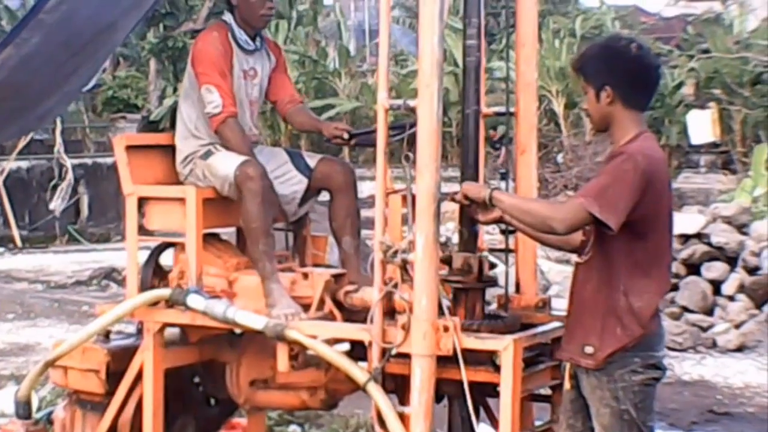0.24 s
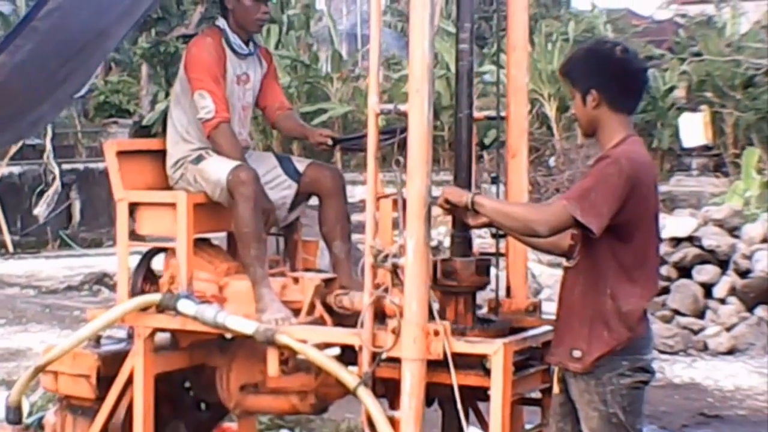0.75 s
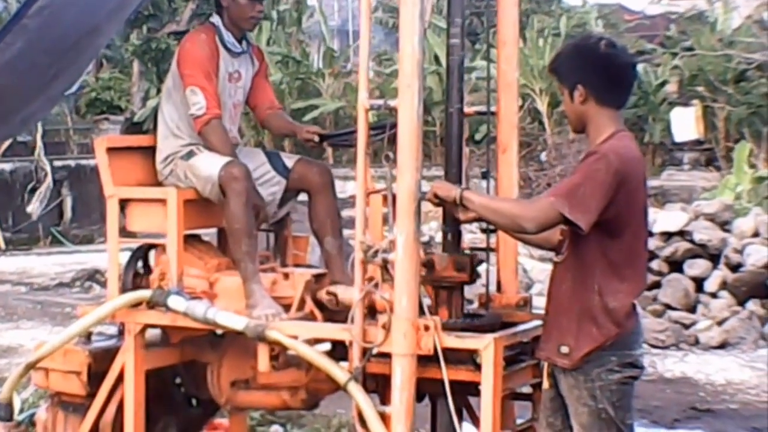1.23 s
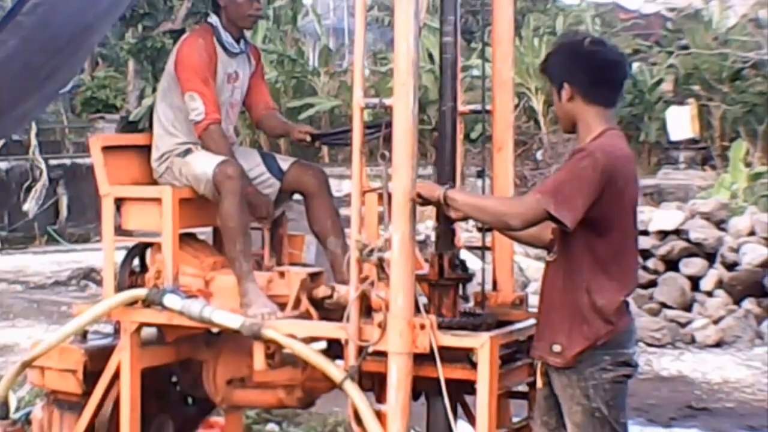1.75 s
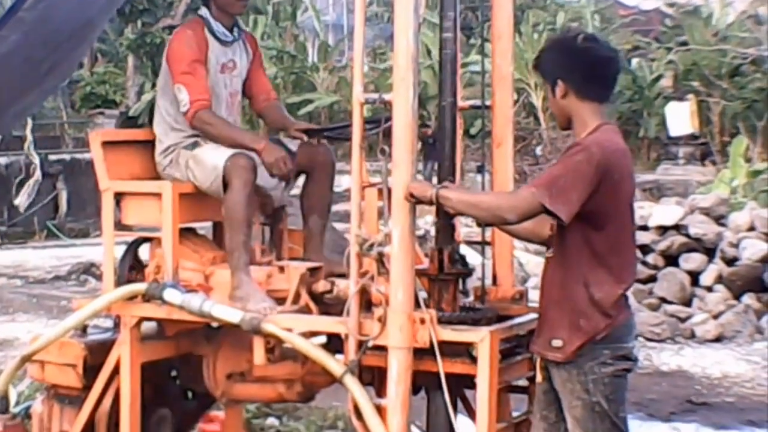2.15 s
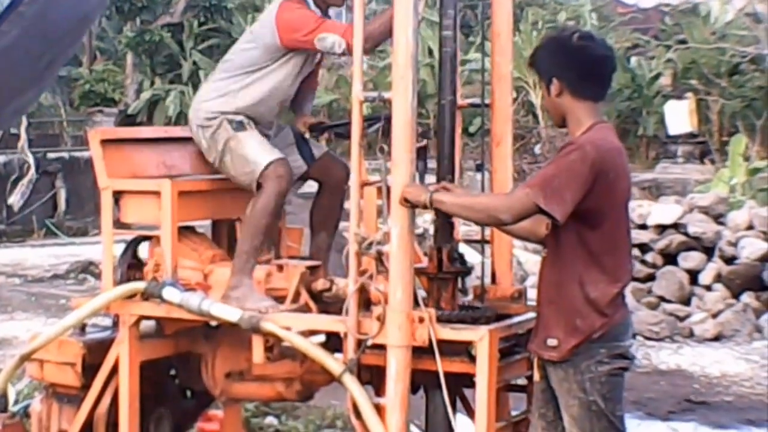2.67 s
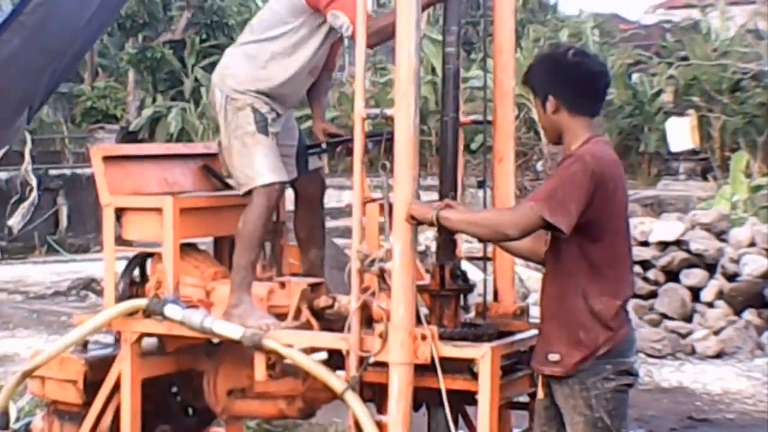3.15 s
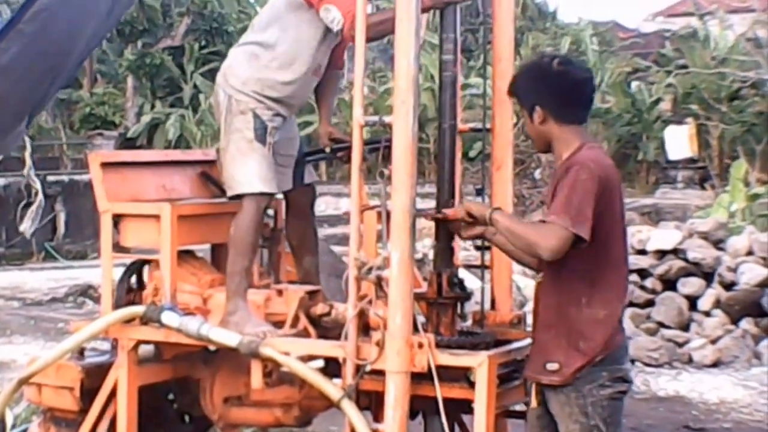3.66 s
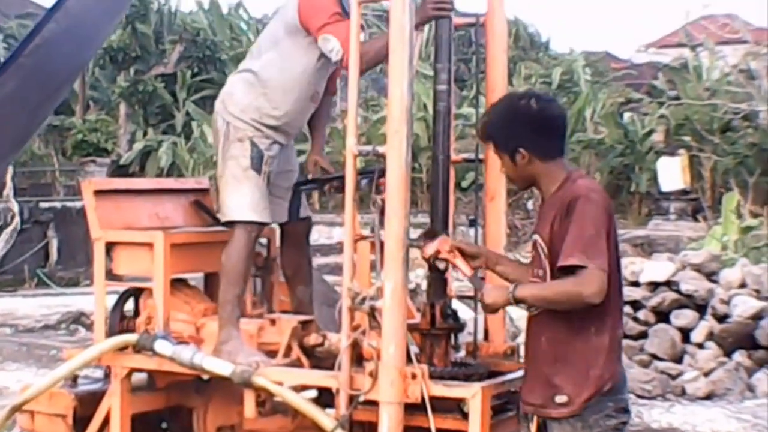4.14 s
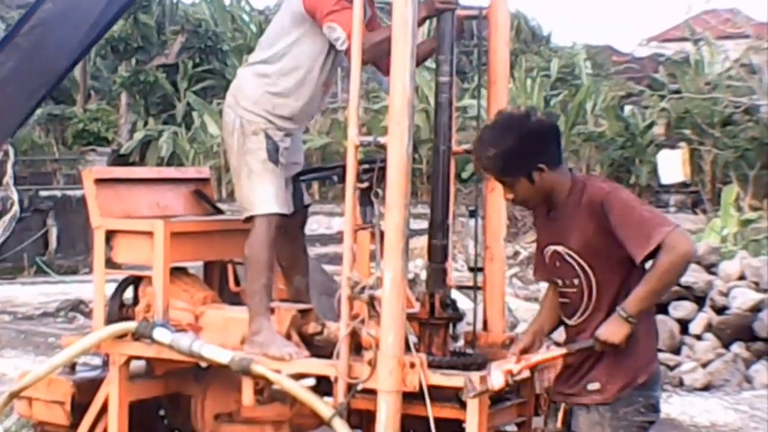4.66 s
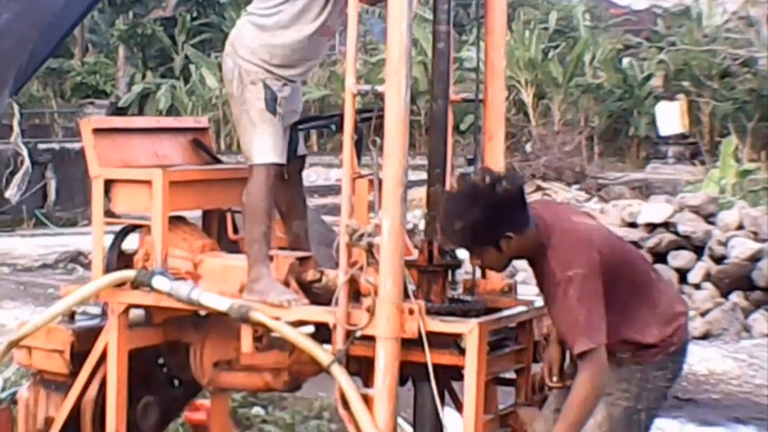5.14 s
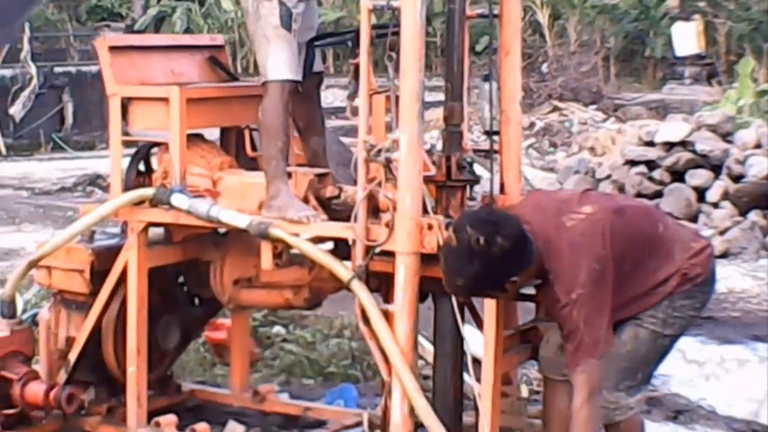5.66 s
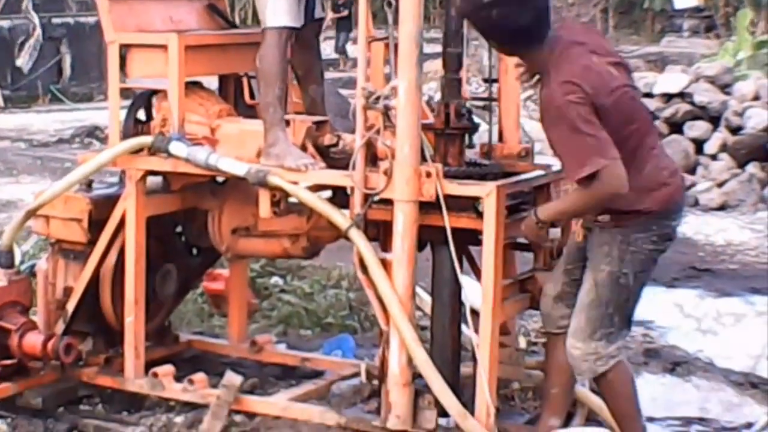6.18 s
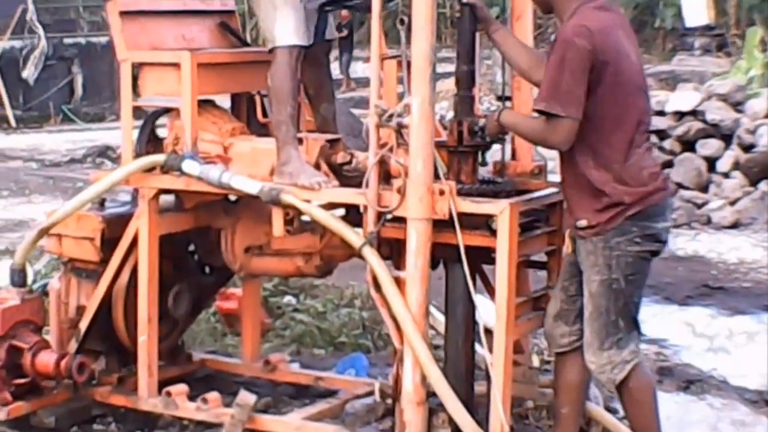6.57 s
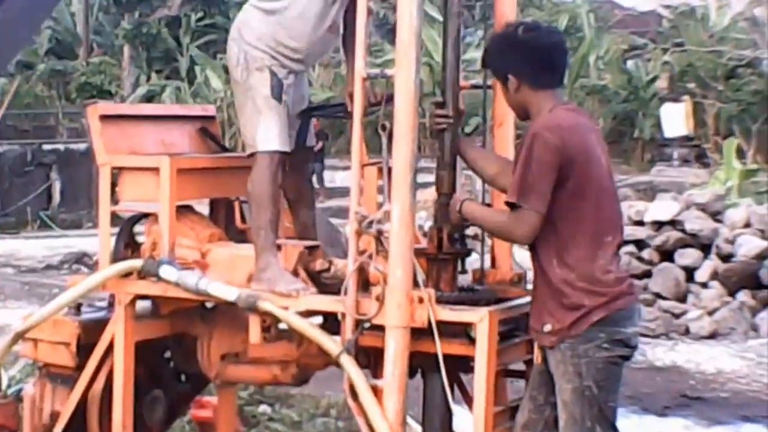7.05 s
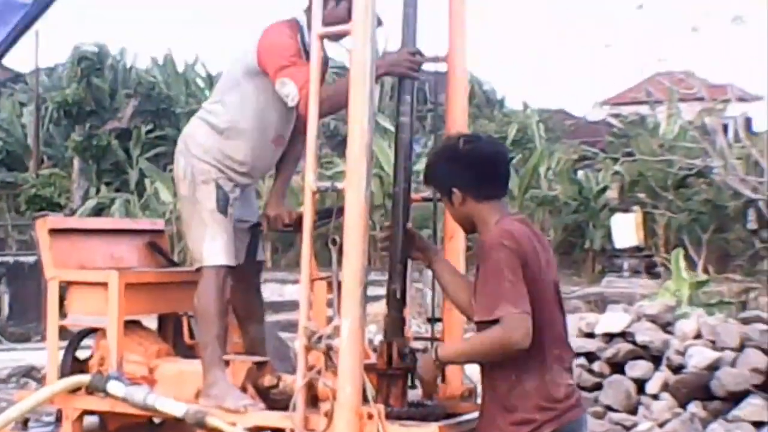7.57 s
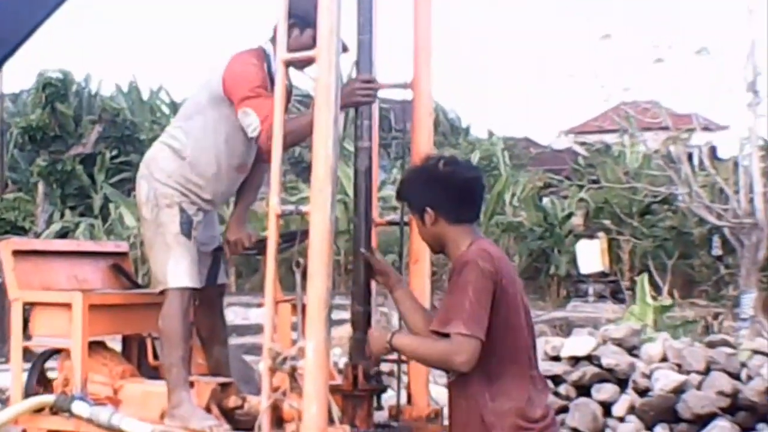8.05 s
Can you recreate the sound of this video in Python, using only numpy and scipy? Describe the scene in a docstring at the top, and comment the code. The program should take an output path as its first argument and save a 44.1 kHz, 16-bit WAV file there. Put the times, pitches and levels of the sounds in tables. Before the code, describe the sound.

A small diesel engine chugs without pause in the open air, its fast even pulse mixing dull exhaust thumps, hollow block knocks, and thin rattling covers and gears. Occasional strokes clatter slightly harder. One abrupt steel-on-steel clank stands out after five seconds, then a soft brighter clink. Near the end comes a barely noticeable squeak while the nearby mono pickup turns away and the engine drops in level.

```python
"""A single-cylinder four-stroke diesel idles on a small drilling rig outdoors, firing nine times a second.
Each cycle rings three gas thumps in pipe and chamber resonances; knocks and a noisy wash of clatter shake
block, covers and gears, each a coloured filter with modes. A steel hand tool drops beside the rig as a
cluster of damped and free modes and clinks again; late on, one tiny squeak, and the microphone turns away."""
import sys
import numpy as np
from scipy import signal
from scipy.fft import rfft, irfft, next_fast_len
from scipy.io import wavfile

SR = 44100
rng = np.random.default_rng(int(sys.argv[2]) if len(sys.argv) > 2 else 0)


def store_pcm(level_fs):
    """Save levels as 16-bit WAV."""
    pcm = np.round(np.clip(level_fs, -1, 1) * 32767).astype(np.int16)
    wavfile.write(sys.argv[1], SR, np.atleast_2d(pcm).T)


N = 366471
TIME = np.arange(N) / SR
MS = 1e-3

# Gas thumps as the valves open and shut. Each row: delay after firing in ms, push (1) or pull (-1),
# relative level in dB, pipe resonance and its width in Hz, chamber resonance and its width in Hz.
GAS_THUMPS = [(25.61, -1, 0.5, 143.98, 29.7, 100.1, 50.6), (58.7, -1, 7, 270.56, 48.6, 170.8, 37.9),
              (89.89, 1, -4, 143.6, 125.8, 188.3, 42.5)]


def from_db(db):
    """Decibels to an amplitude factor."""
    return 10 ** (np.asarray(db) / 20)


def rms_one(x):
    """Scale a signal to an rms of one."""
    return x / np.sqrt(np.mean(x ** 2) + 1e-20)


def read(rows, at):
    """Every further column of a table, interpolated along the first."""
    first, *columns = np.transpose(rows)
    return [np.interp(at, first, column) for column in columns]


def drift(rate):
    """Slow chance with an rms of one, drawn at the given rate per second and joined by straight lines."""
    knots = rng.standard_normal(int(N / SR * rate) + 2)
    return rms_one(np.interp(TIME * rate, np.arange(len(knots)), knots))


def clicks(times, sizes):
    """One impulse of the given size at each time in seconds."""
    at = np.round(times * SR).astype(int)
    inside = (at >= 0) & (at < N)
    # the inaudible offset keeps the signal from being exactly zero
    return np.bincount(at[inside], sizes[inside], N) + 1e-18


def burst(blows, decay_s):
    """Noise that each blow sets going and that dies away exponentially."""
    envelope = signal.lfilter([1], [1, -np.exp(-1 / (decay_s * SR))], blows)
    return envelope * rng.standard_normal(N)


def resonate(x, hz, width):
    """A two-pole resonance, width in Hz, with a gain of about one at its top."""
    r = np.exp(-np.pi * width / SR)
    zeros = np.array([1, 0, -1]) * (1 - r * r) / 2
    poles = [1, -2 * r * np.cos(2 * np.pi * hz / SR), r * r]
    return signal.lfilter(zeros, poles, x)


def ring(x, hz, t60):
    """A unit click starts a sine of height one that falls by 60 dB in t60 seconds."""
    r, w = np.exp(-np.log(1000) / (t60 * SR)), 2 * np.pi * hz / SR
    return signal.lfilter([0, np.sin(w)], [1, -2 * r * np.cos(w), r * r], x)


def iron(force, colour, modes):
    """A body answers a force: a causal filter of the given colour, with its modes on top; rms one."""
    size = 2 * next_fast_len(N // 2 + SR // 4)
    hz, db = np.transpose(colour)
    grid = np.maximum(np.arange(size // 2 + 1) * SR / size, 1)
    gain = from_db(np.interp(np.log(grid), np.log(hz), db))
    # folding the cepstrum forward gives minimum phase: nothing sounds before the blow
    cepstrum = irfft(np.log(gain))
    folded = np.r_[cepstrum[0], 2 * cepstrum[1:size // 2]]
    response = np.exp(rfft(folded, size))
    out = irfft(rfft(force, size) * response)[:N]
    for mode_hz, width, lift_db in modes:
        out = out + (from_db(lift_db) - 1) * resonate(out, mode_hz, width)
    return rms_one(out)


def squeak(s=7.68, hz=6380, db=-44, length_s=0.0042):
    """One tiny high squeak from the machinery: a sine under a bell-shaped envelope."""
    return from_db(db) * np.exp(-((TIME - s) / length_s) ** 2) * np.sin(2 * np.pi * hz * TIME)


def tool(flat_t60=0.0182, free_t60=0.16, crack_db=-15, crack_s=0.00079, scatter_db=-24, scatter_s=0.013):
    """Landing flat, the steel is damped at once and cracks; touched lightly, it rings on."""
    # The tool lands, bounces and is nudged beside the rig. Each row: start in seconds, level in dB,
    # share of dull clank (0-1), level of the free ring in dB.
    tool_hits = [(5.4240, -11, 0.98, -40.5), (5.4259, -12, 0.81, -42), (5.4300, -13.5, 0.98, -42.5),
                 (5.4319, -10, 0.81, -42.5), (5.4333, -12, 0.83, -41.5), (5.438, -22.5, 1, -31),
                 (5.4486, -21.5, 0.92, -30.5), (5.4505, -22.5, 0.94, -30.5), (5.8890, -30, 0.85, -5),
                 (5.9020, -34.5, 1, -17), (5.9250, -33, 0.94, -4.5)]
    # Modes of the steel. Each row: frequency in Hz, level in dB landing flat, level in dB ringing free.
    tool_modes = [(1635, -7, -29.5), (1792, -6.5, -18.5), (2260, -13.5, -24.5), (3672, -10.5, 3),
                  (3932, -10, -17.5), (4130, -18, -8.5), (4520, -6, -4.5), (4683, -8.5, -18),
                  (5030, -23, -6.5), (5800, -19, -20.5), (6735, -30.5, -24.5), (7542, -41.5, -19),
                  (8488, -26, -23.5), (11500, -41, -24.5), (12360, -31, -25.5)]
    s, db, clank, free_db = np.transpose(tool_hits)
    out = 0
    for hz, flat_db, ring_db in tool_modes:
        # every hit excites each mode a little differently, with either sign
        strength = from_db(db + rng.standard_normal(len(s))) * rng.choice([-1, 1], len(s))
        flat_blows = clicks(s, strength * clank * from_db(flat_db))
        free_blows = clicks(s, strength * from_db(free_db + ring_db))
        out = out + ring(flat_blows, hz, flat_t60) + ring(free_blows, hz, free_t60)
    blows = clicks(s, from_db(db) * clank)
    crack = from_db(crack_db) * resonate(burst(blows, crack_s), 3900, 5400)
    # the frame of the rig scatters the blow into a short, duller tail
    band = signal.butter(2, [1400, 5500], "band", fs=SR, output="sos")
    scatter = signal.sosfilt(band, burst(blows, scatter_s))
    return out + crack + from_db(scatter_db) * scatter


def crank(first_firing_s=-0.04537, cycle_s=0.11119, quickening_s=6.08e-6):
    """Firing times of an idle whose every cycle is a shade shorter, and seconds since the last firing."""
    cycles = cycle_s - quickening_s * np.arange(int(N / SR / cycle_s) + 2)
    fired = first_firing_s + np.r_[0, np.cumsum(cycles)]
    since = TIME - fired[np.searchsorted(fired, TIME, "right") - 1]
    return fired, since


def thumps(fired, uneven_db=0.5):
    """Each puff of gas rings a pipe and then a chamber, nearly alike from cycle to cycle."""
    out = 0
    for ms, push, db, pipe_hz, pipe_width, chamber_hz, chamber_width in GAS_THUMPS:
        sizes = np.sign(push) * from_db(db + uneven_db * rng.standard_normal(len(fired)))
        puffs = clicks(fired + ms * MS, sizes)
        in_pipe = resonate(puffs, pipe_hz, pipe_width)
        out = out + resonate(in_pipe, chamber_hz, chamber_width)
    low_pass = signal.butter(2, 1100, fs=SR, output="sos")
    return rms_one(signal.sosfilt(low_pass, out))


def knocks(fired, uneven_db, jitter_ms):
    """Ignition and the piston crossing its bore strike block and covers at nearly set times after firing."""
    # Each row: delay after firing in ms, relative level in dB into the block, the same into the covers.
    knock_rows = [(1.187, 12.5, 16.5), (3.595, -7.5, 16.5), (7.281, 18.5, 12.5), (14.772, 21.5, 18),
                  (36.5, 13.5, 17), (60.09, 17, 3)]
    block, covers = 0, 0
    for ms, block_db, cover_db in knock_rows:
        late, strong = rng.standard_normal((2, len(fired)))
        blows = clicks(fired + (ms + jitter_ms * late) * MS, from_db(uneven_db * strong))
        block = block + from_db(block_db) * blows
        covers = covers + from_db(cover_db) * blows
    return block, covers


def clatter(since, recurring, grain_db, flutter_db, per_s=5000):
    """Tiny contacts of uneven size; a share of the noise power recurs alike after every firing."""
    sizes = rng.standard_normal(N) * from_db(grain_db * np.minimum(rng.exponential(1, N), 5))
    contacts = rms_one(sizes * (rng.random(N) < per_s / SR))
    share = np.clip(recurring, 0, 1)
    # one noise pattern, read again from its start at each firing
    place = np.clip(since * SR, 0, SR - 1).astype(int)
    same = rms_one(rng.standard_normal(SR)[place])
    mixed = np.sqrt(1 - share) * contacts + np.sqrt(share) * same
    return mixed * from_db(flutter_db * drift(70))


def swell(since, start_db, fade_db_per_s, attack_s=0.01325, hold_s=0.05986):
    """Each firing sets the clatter going; it holds through the power stroke, then dies down."""
    rising = np.maximum(1 - since / attack_s, 0)
    fading = np.maximum(since - hold_s, 0)
    return from_db(start_db * rising - fade_db_per_s * fading)


def valves(since, lag_s=0.00352, length_s=0.00433):
    """A short bell-shaped swell of valve gear rattle just after each gas thump."""
    return sum(np.exp(-((since - ms * MS - lag_s) / length_s) ** 2) for ms, *_ in GAS_THUMPS)


def loads(fired, since, burn_db=0.5, wander_db=0.3373, block_wander_db=0.9, valve_db=4):
    """How hard block, covers and gears are shaken; no two charges burn alike, and the block varies most."""
    burn = rng.standard_normal(len(fired))[np.searchsorted(fired, TIME, "right") - 1]
    block = swell(since, start_db=-7, fade_db_per_s=127) * from_db(block_wander_db * drift(6))
    covers = swell(since, start_db=-1.0, fade_db_per_s=143)
    gears = swell(since, start_db=-2, fade_db_per_s=126) * from_db(valve_db * valves(since))
    return from_db(burn_db * burn + wander_db * drift(25)) * np.array([block, covers, gears])


def hard_strokes(block_db=-7.0, cover_db=-8.5, gear_db=-10, stroke_s=0.0118):
    """Now and then the parts meet harder: an extra load that dies within the cycle, one row for each part."""
    # Each row: start in seconds, then relative peak in dB for gears, block and covers before the trims above.
    stroke_rows = [(0.7311, -33.5, -24, -21), (0.9701, -31.5, -28.5, -20), (1.189, -30.5, -14, -21),
                   (1.6247, -38, -25, -20), (2.1894, -37, -22, -23), (2.8467, -32.5, -21.5, -27),
                   (3.9704, -29, -20, -24), (4.638, -35, -18.5, -23.5), (4.8435, -26, -29.5, -24),
                   (5.0639, -34, -19.5, -25), (5.8417, -29, -20, -28.5), (6.6159, -26.5, -22, -23),
                   (7.063, -28, -21, -17)]
    s, gear, block, covers = np.transpose(stroke_rows)
    bursts = [clicks(s, from_db(db)) for db in (block + block_db, covers + cover_db, gear + gear_db)]
    return signal.lfilter([1], [1, -np.exp(-1 / (stroke_s * SR))], bursts)


def engine(block_knock_db=0.5, cover_knock_db=1.0):
    """Thumps below; knock and clatter in the block and thin covers, clatter alone in the gears."""
    # Broad colour of each part. Each row: frequency in Hz, relative level in dB.
    block_colour, cover_colour, gear_colour = [(20, -23.5), (45, -23), (130, -12.5), (290, -10), (400, -15),
                                               (490, -21.5), (560, -11.5), (680, -10.5), (760, -4.5),
                                               (900, -2), (1000, -3), (1150, -13), (1350, -39),
                                               (3000, -63.5)], [(600, -51), (1000, -17), (1200, -7),
                                                              (1400, -1), (1720, -3.5), (1780, -13.5),
                                                              (1900, -5), (2130, -10), (2380, -9),
                                                              (2600, -25), (3200, -42), (6000, -86.5)], [(1500, -38), (2500, -7),
                                                                              (2950, 4.5), (3250, -3),
                                                                              (3700, 0.5), (4400, -2.5),
                                                                              (5500, -7), (6850, -11),
                                                                              (7200, -20.5), (8400, -20.5),
                                                                              (9200, -17.5), (10800, -21),
                                                                              (11200, -24), (15700, -24)]
    # Resonances standing out of that colour. Each row: frequency in Hz, width in Hz, lift in dB.
    block_modes, cover_modes, gear_modes = [(272.2, 10, 6.5), (462.6, 20.5, 7.5), (763.6, 13, 3.5),
                                            (827.6, 13.7, 2.5), (916.5, 26.6, 6.5)], [(1157.7, 24.3, 5.7), (1270.6, 31.7, 10.46),
                                                                 (1409, 13.4, 4.22), (1481, 16.4, 5.74),
                                                                 (1602.4, 42, 2.1), (1752.7, 20, 5.66),
                                                                 (1876, 23, 0.5), (2204, 57, 2.14)], [(4254, 205, 2.14),
                                                                                      (6290, 66, 1.85),
                                                                                      (8650, 81, 6.5),
                                                                                      (9130, 152, 2.6),
                                                                                      (10640, 80, 5),
                                                                                      (12600, 80, 8.6),
                                                                                      (13130, 260, 4.2),
                                                                                      (14000, 310, 3.1),
                                                                                      (14440, 80, 6.8)]
    # The microphone edges closer, then turns away. Each row: time in seconds, engine level in dB.
    facing = [(0, 0.43), (4.3, -0.2151), (5.4, 0.17), (6.0, 1.2), (7.45, 1.16), (7.9, -2.5), (8.31, -5.5)]
    fired, since = crank()
    # thumps, block, covers and gears at the microphone, in dB before the facing is added
    level = from_db([[-31], [-29.5], [-32.5], [-46]]) * from_db(read(facing, TIME))
    # dividing by the level keeps the hard strokes' strength independent of the facing
    block_load, cover_load, gear_load = np.hypot(loads(fired, since), hard_strokes() / level[1:])
    block_knock, cover_knock = knocks(fired, uneven_db=1.6, jitter_ms=0.065)

    block_clatter = clatter(since, recurring=0.128, grain_db=0.99, flutter_db=-0.0345, per_s=8000)
    block_force = from_db(block_knock_db) * block_knock + block_load * block_clatter
    block = iron(block_force, block_colour, block_modes)

    cover_clatter = clatter(since, recurring=0.0694, grain_db=0.5, flutter_db=0.4441, per_s=9000)
    cover_force = from_db(cover_knock_db) * cover_knock + cover_load * cover_clatter
    covers = iron(cover_force, cover_colour, cover_modes)

    gear_clatter = clatter(since, recurring=0.029, grain_db=1.0, flutter_db=0.98, per_s=12000)
    gears = iron(gear_load * gear_clatter, gear_colour, gear_modes)
    return np.sum(level * [thumps(fired), block, covers, gears], axis=0)


def reflected(x):
    """Short reflections comb the sound, hollowing it near 850 Hz and lifting 1.3 and 2 kHz."""
    # A nearby surface reflects more as the microphone swings round. Each row: time in seconds, strength.
    swing = [(0, 0.0079), (6.1, 0.029), (6.8, 0.103), (7.4, 0.209), (8.31, 0.258)]
    # Its reflections. Each row: delay in ms, signed share of the strength.
    reflections = [(1.29, -.9), (1.45, .35), (1.54, 1)]
    strength, = read(swing, TIME)
    echoes = 0
    for ms, share in reflections:
        delay_s = round(ms * MS * SR) / SR
        echoes = echoes + share * np.interp(TIME - delay_s, TIME, x)
    return x + strength * echoes


def scene():
    """The rig in the open air, one channel."""
    return reflected(engine() + tool() + squeak())[None]


def record(dry, cutoff_hz=15800):
    """The top is cut steeply by an elliptic low-pass."""
    low_pass = signal.ellip(12, .1, 80, cutoff_hz, fs=SR, output="sos")
    return signal.sosfilt(low_pass, dry)


dry = scene()
out = record(dry)
store_pcm(out)
```